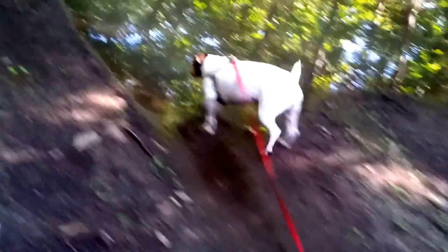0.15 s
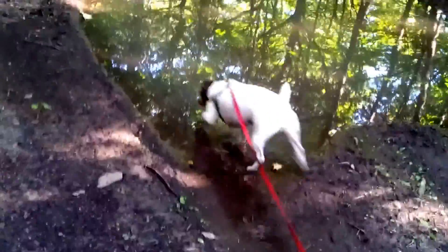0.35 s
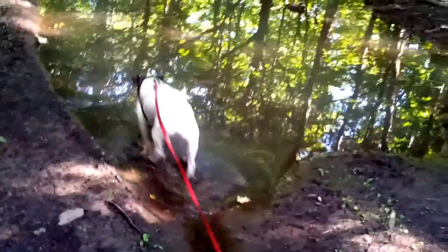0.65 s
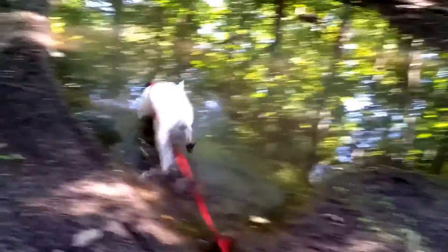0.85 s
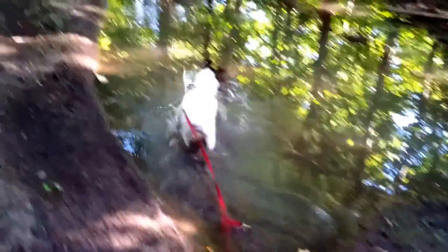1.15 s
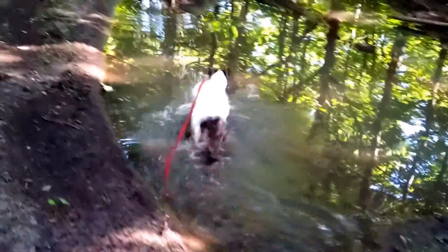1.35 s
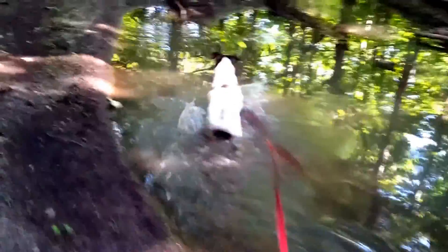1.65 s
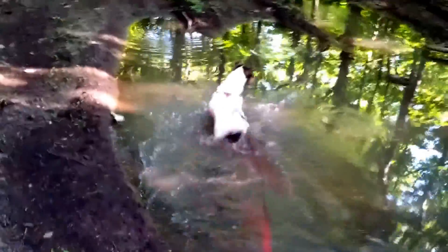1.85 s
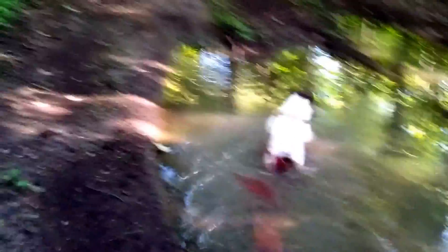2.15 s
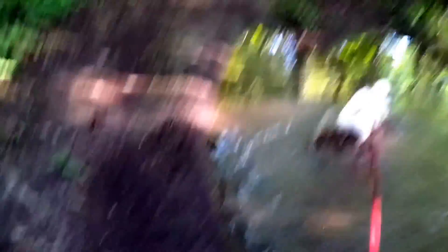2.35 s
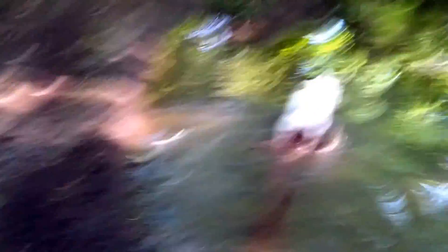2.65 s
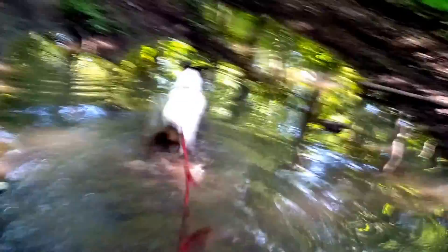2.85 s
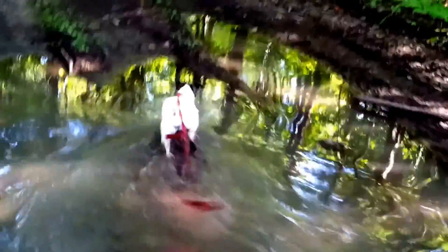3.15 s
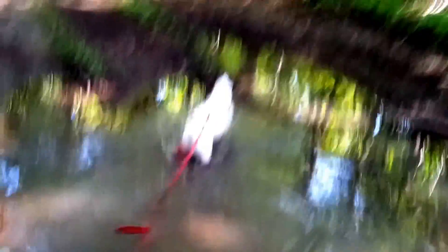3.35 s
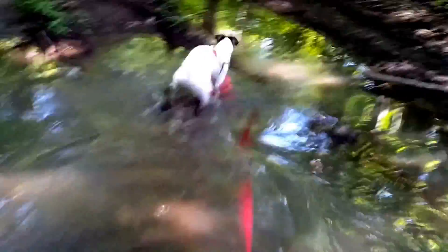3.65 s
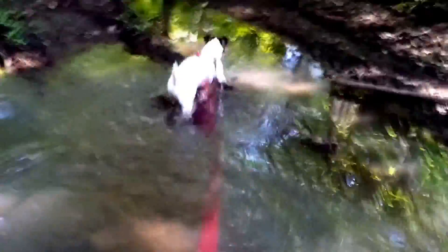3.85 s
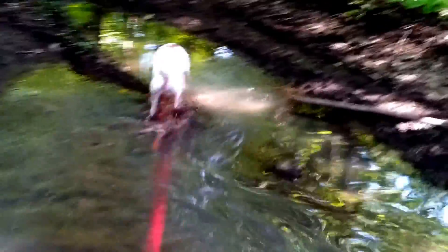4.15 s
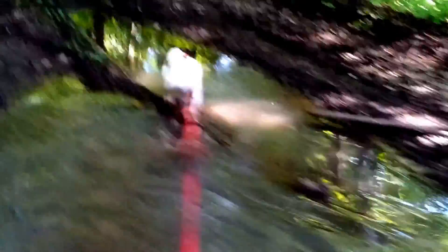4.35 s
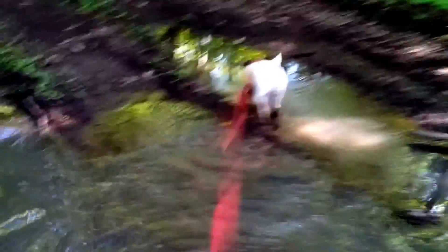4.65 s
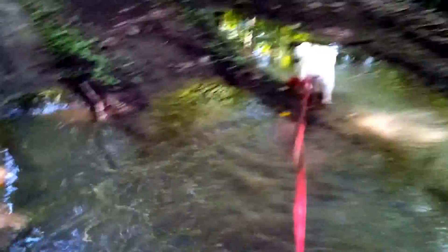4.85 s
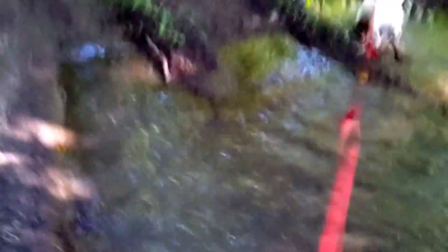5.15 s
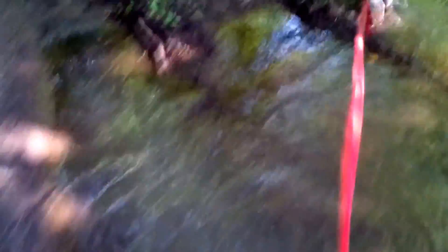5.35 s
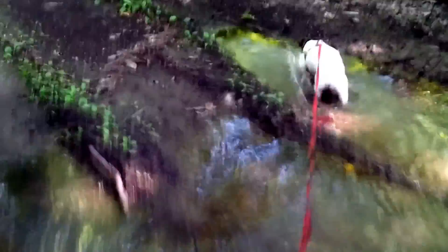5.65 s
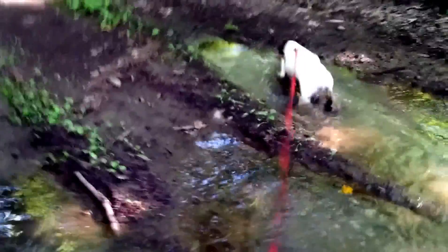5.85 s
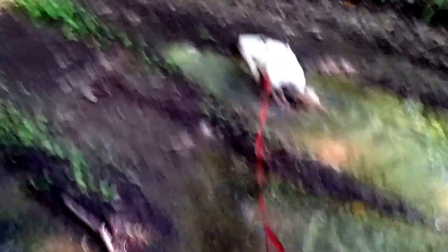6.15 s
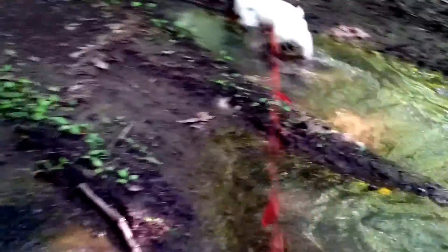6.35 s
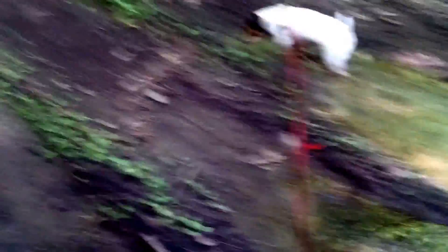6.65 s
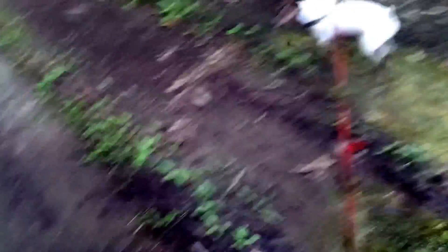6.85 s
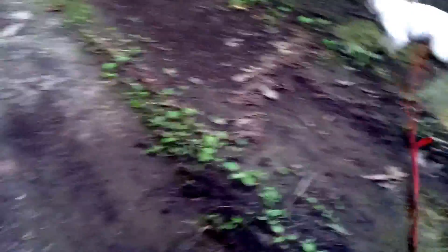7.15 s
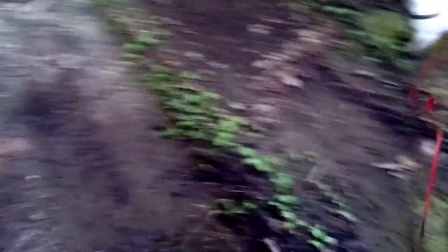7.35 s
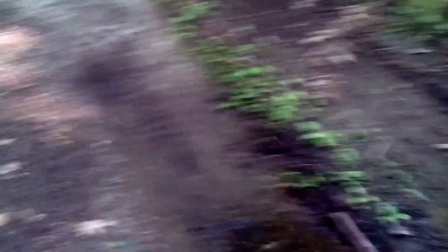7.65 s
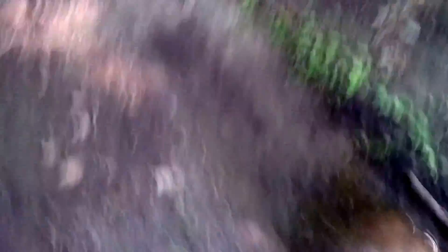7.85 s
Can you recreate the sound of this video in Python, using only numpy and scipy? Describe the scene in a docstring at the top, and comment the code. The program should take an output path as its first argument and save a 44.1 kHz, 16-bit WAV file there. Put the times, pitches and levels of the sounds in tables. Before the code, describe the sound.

A small dog and its walker wade through a shallow woodland stream, heard very close on a hand-held stereo microphone in open, dry air. A faint wash and trickle run throughout. From 0 to 0.6 s there is mostly light, crisp spray and small drop snaps. From about 0.7 s the slosh deepens, with hollow plops and a strong splash near 1.2 s, a sharp slap at 1.5 s, and rapid bubbling strokes through 4 s, including a dull bump at 3.2 s and bright slaps around 3.7 to 3.9 s. From 4.1 to 5.2 s it is thinner, spitting and fizzy. Bumps at 5.5 and 5.7 s accompany fuller sloshing, and a low, heavy plunge lands at 6 s. Splashing lightens around 6.5 to 7.2 s, then plops and gurgles return at 7.3 to 7.7 s. At 7.97 s a hard, short knock hits the casing, mainly left.

```python
"""A small dog and its walker wade through a shallow woodland stream, close to a hand-held camera.
Leg strokes swell a slosh of bubbles and a fizz of spray bursts and pings over rippling churn.
Noise slaps, plopping air pockets, low foot plunges, gurgles and pinging droplets stand out of it.
Shaped noise and faint bubbles make the stream; damped bubble shapes make a few dull bumps.
At the very end a knock rings the camera casing, strongest at the left microphone port."""
import sys
import numpy as np
from scipy import signal
from scipy.fft import rfft, irfft
from scipy.io import wavfile

SR = 44100
rng = np.random.default_rng(int(sys.argv[2]) if len(sys.argv) > 2 else 0)


def inscribe(sig):
    """Save sig as 16-bit PCM at rate SR to the path in sys.argv[1].

    A 1-D sig is mono; a 2-D sig holds one channel per row.
    Samples are clipped to [-1, 1] before scaling.
    """
    pcm = np.round(np.clip(np.atleast_2d(sig).T, -1, 1) * 32767)
    wavfile.write(sys.argv[1], SR, pcm.astype(np.int16))


N = 352359
HZ = np.fft.rfftfreq(N, 1 / SR)
TIME = np.arange(N) / SR

# large air pockets closing behind a leg: t/s, relative level/dB, f/Hz
AIR_POCKETS = [(0.684, -30.5, 1250), (0.925, -20.5, 970), (1.0456, -26.5, 1130), (1.093, -20, 780),
               (1.2021, -17, 1120), (1.2258, -18.5, 670), (1.412, -26.5, 597), (1.5109, -23.5, 1590),
               (1.7675, -25, 620), (2.007, -19, 766), (2.054, -24.5, 1060), (2.5794, -25.5, 710),
               (2.802, -31.5, 980), (2.916, -24, 826), (3.145, -17, 710), (3.2378, -25, 670),
               (3.283, -23, 1510), (3.3154, -18, 1160), (3.512, -24.5, 714), (3.5537, -22.5, 740),
               (3.657, -24, 1280), (3.7317, -14.5, 830), (3.921, -21, 704), (4.9606, -21.5, 1310),
               (5.307, -31, 1160), (5.564, -29, 745), (5.6584, -19.5, 830), (5.9771, -17, 406),
               (5.9878, -15.5, 620), (5.996, -14.5, 840), (6.3474, -23.5, 1340), (6.5098, -24, 1340),
               (6.8594, -26.5, 1430), (6.907, -36, 910), (6.986, -33.5, 760), (7.121, -30, 1450),
               (7.3316, -30, 950), (7.3644, -18, 683), (7.5798, -20.5, 690), (7.594, -23.5, 627),
               (7.7121, -16, 840)]


def gain_of(db):
    """Decibels to amplitude."""
    return 10 ** (np.asarray(db) / 20)


def evened(x):
    """Scales to rms 1."""
    return x / np.sqrt(np.mean(x ** 2) + 1e-20)


def read(points, hz=HZ):
    """Interpolates a table on a log-frequency axis."""
    f, value = np.transpose(points)
    return np.interp(np.log(hz + 1), np.log(f), value)


def add(mix, start_s, sound):
    """Mixes a sound in at start_s."""
    part = mix[..., max(round(start_s * SR), 0):][..., :sound.shape[-1]]
    part += sound[..., :part.shape[-1]]


def colour(x, spectrum):
    """Filters by a spectrum; white noise keeps its level."""
    return irfft(rfft(x) * evened(gain_of(read(spectrum))), N)


def shelf(x, corner_hz, db):
    """Raises what lies below the corner by db, which may change in time."""
    low = irfft(rfft(x) / (1 + (HZ / corner_hz) ** 4), N)
    return x + (gain_of(db) - 1) * low


def ports(pair, direct=0):
    """Mixes a pair into partly alike left and right microphone ports; direct is the least likeness."""
    # likeness of the ports: f/Hz, likeness/(0-1)
    likeness = [(30, 0.25), (120, 0.5), (300, 0.78), (1000, 0.66), (2200, 0.72), (4500, 0.42), (8000, 0.3),
                (13000, 0.52)]
    # left minus right: f/Hz, level/dB
    balance = [(40, 10.3), (130, 4.6), (300, 2.1), (700, 0.45), (2400, 0.46), (4400, 3.4), (8100, 10),
               (13000, 5.5)]
    # phase by which left leads: f/Hz, phase/rad
    lead = [(260, 0.57), (800, 0.29), (3200, 0.81), (4400, 1.6), (7400, -1.6), (8600, -2.3), (11000, -1.5)]
    a, b = rfft(pair)
    same = np.clip(np.maximum(read(likeness), direct), 0, 1)
    right = (same * a + np.sqrt(1 - same ** 2) * b) * np.exp(-1j * read(lead))
    lean = gain_of(read(balance) / 2)
    return irfft(np.array([a * lean, right / lean]), N)


def clicks(per_s, spread_db, limit=4):
    """Sparse random impacts: many small, a few large."""
    strength = np.minimum(rng.exponential(1, N), limit)
    return (rng.random(N) < per_s / SR) * gain_of(spread_db * strength)


def bubble(hz, swell_s, rise, phase=0):
    """A pocket of air swells, rings and decays; a positive rise lifts its pitch as it nears the surface."""
    u = np.arange(int(8 * swell_s * SR) + 2) / (swell_s * SR)
    turns = hz * swell_s * (u - 1 + rise * (u - 1) ** 2 / 2)
    return (u * np.exp(1 - u)) ** 2 * np.cos(2 * np.pi * turns + phase)


def bubbles(low_hz, high_hz, cycles, spread_db, count, size, glide=.05):
    """Bubbles in families of like moment, pitch and strength; each has its own phase at the two ports."""
    family = 4
    shared = rng.random((3, count // family, 1))
    when, pitch, strength = np.repeat(shared, family, axis=1)
    delay, detune, length, drift, left, right = rng.random((6, count, 1))
    when = when + .02 * delay ** 2 * SR / N  # up to 20 ms late
    hz = low_hz * (high_hz / low_hz) ** pitch * 2 ** (.5 * (detune - .5))
    swell_s = cycles * (.5 + length) / hz
    u = np.arange(size) / (swell_s * SR)
    envelope = gain_of(-spread_db * np.log(strength + 0.013)) * (u * np.exp(1 - u)) ** 2
    # most climb in pitch as they rise; some are dragged down
    turns = hz * swell_s * u * (1 + glide * (2 * drift - .7) * u)
    at = ((when * N).astype(int) + np.arange(size)).ravel()
    sides = []
    for phase in (left, right):
        ringing = envelope * np.cos(2 * np.pi * (turns + phase))
        sides.append(np.bincount(at, ringing.ravel(), N)[:N])
    return evened(np.array(sides))


def ripple(low_hz, high_hz):
    """A slow random wobble of rms 1, summed from sines that weaken with frequency."""
    t = np.arange(0, N + 128, 128) / SR
    waves = np.zeros(len(t))
    for hz, turn in zip(np.geomspace(low_hz, high_hz, 24), rng.random(24)):
        waves += np.sin(2 * np.pi * (hz * t + turn)) / np.sqrt(hz)
    return np.interp(TIME, t, evened(waves))


def stream(trickle_db=-59):
    """The even wash of stream and woods is shaped noise; faint bubbles make the trickle."""
    # wash spectrum: f/Hz, relative density/dB
    wash_spectrum = [(20, -6.5), (60, -1), (200, -2.1), (450, -6.5), (800, -8), (1600, -14.5),
                     (3000, -11.5), (6000, -4), (10000, -10.5), (15000, -29)]
    wash_db = -44.5
    wash = gain_of(wash_db) * colour(rng.standard_normal((2, N)), wash_spectrum)
    trickle = bubbles(low_hz=594, high_hz=3280, cycles=4.2, spread_db=0.0, count=600, size=1024)
    return wash + gain_of(trickle_db) * trickle


def bumps(level_db=-1, cycles=0.55, left_db=-3, lag_s=0.00019):
    """Dull bumps near the camera, perhaps the leash handle: damped pulses that reach the left port first."""
    # t/s, relative level/dB, f/Hz
    bump_rows = [(2.213, -28.5, 420), (3.2, -10, 770), (5.196, -21.5, 1000), (5.5332, -9.5, 790),
                 (5.71, -14.5, 790), (7.683, -16, 640)]
    out = np.zeros((2, N))
    for start_s, db, hz in bump_rows:
        bump = gain_of(db + level_db) * bubble(hz, cycles / hz, 0)
        add(out[0], start_s, gain_of(left_db) * bump)
        add(out[1], start_s + lag_s, bump)
    return out


def knock(right_db=-17, click_db=-24, click_s=0.0014, low_hz=145, lag_s=0.00121,
          overload=1.5, sway_db=-26, sway_hz=48, sway_s=0.027):
    """A tap rings the casing's modes, overloads and sways; the right port hears it later and weaker."""
    # the tap: t/s, level before overload/dB
    knock_s, knock_db = (7.9657, 0)
    # casing modes: f/Hz, relative level/dB, decay/s
    casing_modes = [(260, -15, 0.0089), (470, 1.5, 0.0017), (706, 3, 0.0016), (1120, 2, 0.0016),
                    (2130, -20, 0.00092)]
    t = np.arange(SR // 25) / SR
    ring = np.zeros(len(t))
    for hz, db, decay_s in casing_modes:
        ring += gain_of(db) * np.exp(-t / decay_s) * np.sin(2 * np.pi * hz * t)
    tick = gain_of(click_db) * np.exp(-t / click_s) * rng.standard_normal(len(t))
    blow = np.clip(gain_of(knock_db) * (ring + tick), -overload, overload)
    tap = signal.lfilter(*signal.butter(2, low_hz, "high", fs=SR), blow)
    tap = tap - gain_of(sway_db) * np.exp(-t / sway_s) * np.sin(2 * np.pi * sway_hz * t)
    out = np.zeros((2, N))
    add(out[0], knock_s, tap)
    add(out[1], knock_s + lag_s, gain_of(right_db) * tap)
    return out


def drips(level_db=-44, spread_db=7, low_hz=700, high_hz=2100, cycles=3.37, rise=0.038, count=70):
    """Stray drops from legs and leash each leave one small rising bubble; the small ones are fainter."""
    out = np.zeros(N)
    for when, size, strength in rng.random((count, 3)):
        hz = low_hz * (high_hz / low_hz) ** size
        gain = gain_of(level_db - spread_db * strength) * np.sqrt(low_hz / hz)
        add(out, when * N / SR, gain * bubble(hz, cycles / hz, rise))
    return np.array([out, out])


def ticks(level_db=-27, spread_db=9, decay_s=.0004, count=36):
    """Single drops flung near the microphone land with a tiny bright noise tick."""
    t = np.arange(SR // 200) / SR
    out = np.zeros((2, N))
    for when, strength in rng.random((count, 2)):
        burst = np.exp(-t / decay_s) * rng.standard_normal((2, len(t)))
        add(out, when * N / SR, gain_of(level_db - spread_db * strength) * burst)
    return colour(out, [(2500, -25), (6000, 2), (9000, 0), (15000, -10)])


def droplets(level_db=-3, cycles=4, rise=0.018):
    """Each landing droplet traps a tiny bubble that pings briefly."""
    # t/s, relative level/dB, f/Hz
    droplet_rows = [(0.9392, -13, 4610), (1.0066, -15, 4710), (1.0635, -20, 3840), (2.4099, -22, 2900),
                    (2.69, -21, 2840), (2.9348, -17.5, 4650), (3.6508, -11.5, 6740), (4.0243, -22, 2450)]
    out = np.zeros(N)
    for start_s, db, hz in droplet_rows:
        add(out, start_s, gain_of(db + level_db) * bubble(hz, cycles / hz, rise))
    return np.array([out, out])


def gurgles(level_db=-2, cycles=6, follower_db=-7, spacing_s=0.018, detune=0.19):
    """Bubbles in a leg's wake ring and glide, each with a weaker one loosely before and after it."""
    # t at its height/s, relative level/dB, f/Hz, glide/share of f
    gurgle_rows = [(1.01, -33, 738, -0.083), (1.158, -31, 670, -0.086), (1.313, -33, 727, -0.019),
                   (1.492, -28, 750, 0.0043), (1.595, -30, 646, -0.061), (1.68, -33.5, 657, 0.059),
                   (1.749, -36, 670, 0.041), (1.871, -31, 1260, 0.059), (1.892, -35, 800, 0.013),
                   (1.921, -29.5, 632, -0.047), (2.235, -32.5, 1500, 0.028), (2.251, -27.5, 707, 0.022),
                   (2.346, -30.5, 1530, -.05), (2.401, -33, 637, -0.033), (2.597, -31.5, 682, 0.0072),
                   (2.9, -35, 663, -0.018), (3.303, -26.5, 1245, 0.023), (3.382, -32, 805, -0.0006),
                   (3.519, -33, 1330, 0.2), (3.526, -32, 723, -0.0037), (3.642, -30, 1520, 0.12),
                   (4.803, -35.5, 654, 0.0031), (6.424, -31, 1200, -0.011), (7.449, -32.5, 695, 0.06),
                   (7.858, -37, 907, .12)]
    out = np.zeros(N)
    chances = rng.uniform(-0.994, 1, (len(gurgle_rows), 3, 2))
    for (peak_s, db, hz, glide), chance in zip(gurgle_rows, chances):
        for place, (late, off) in zip((-1, 0, 1), chance):
            pitch_hz = hz * (1 + place * (glide + detune * off))
            swell_s = cycles / pitch_hz
            start_s = peak_s + place * spacing_s * (1 + late / 2) - swell_s
            gain = gain_of(db + level_db + abs(place) * follower_db)
            add(out, start_s, gain * bubble(pitch_hz, swell_s, glide))
    return np.array([out, out])


def plunges(level_db=-3, decay_s=0.015, rumble_db=-6):
    """A foot shoves the water down to the bed: a dull damped throb and a short low churn of noise."""
    # t/s, relative level/dB, f/Hz
    plunge_rows = [(0.727, -34.5, 193), (1.204, -27.5, 205), (1.225, -37, 300), (1.413, -35, 343),
                   (1.647, -35, 220), (2.088, -23, 386), (2.61, -36, 282), (3.448, -34.5, 340),
                   (3.731, -27.5, 180), (4.586, -38, 121), (5.53, -30.5, 376), (5.972, -20.5, 390),
                   (5.98, -28, 122), (6.003, -28, 264), (7.582, -33.5, 290)]
    t = np.arange(SR // 8) / SR
    throb, churn = np.zeros((2, 2, N))
    for start_s, db, hz in plunge_rows:
        add(throb, start_s, gain_of(db) * bubble(hz, 0.68 / hz, 0.017))
        burst = np.exp(-t / decay_s) * rng.standard_normal((2, len(t)))
        add(churn, start_s, gain_of(db + rumble_db) * burst)
    churn = colour(churn, [(50, -27), (130, 7.5), (260, 5.0), (500, 3.0), (1200, -13), (4000, -60)])
    return ports(gain_of(level_db) * throb, direct=0.82) + ports(churn)


def splatter(level_db=-13, decay_s=0.0057):
    """The water closing over each air pocket splatters: a short noise burst."""
    t = np.arange(SR // 20) / SR
    out = np.zeros((2, N))
    for start_s, db, _ in AIR_POCKETS:
        burst = np.exp(-t / decay_s) * rng.standard_normal((2, len(t)))
        add(out, start_s, gain_of(db + level_db) * burst)
    return colour(out, [(200, -18.0), (700, 6.5), (1700, 0.5), (4000, -8), (9000, -37)])


def plops(level_db=0.5, rise=0.008, after_db=-15, after_s=0.00513):
    """Each large air pocket rings, violent ones more briefly, and sheds a weaker bubble as it closes."""
    swell_cycles = 1.29  # at reference_db
    reference_db = -22
    halving_db = 20  # this much louder halves the swell
    out = np.zeros(N)
    chances = rng.random((len(AIR_POCKETS), 3))
    for (start_s, db, hz), (turn, size, wait) in zip(AIR_POCKETS, chances):
        swell_s = swell_cycles * 2 ** ((reference_db - db) / halving_db) / hz
        pocket = bubble(hz, swell_s, rise, 2 * np.pi * turn)
        follower = bubble(hz * (0.846 + 0.57 * size), 2 * swell_s, rise)
        add(out, start_s, gain_of(db + level_db) * pocket)
        add(out, start_s + after_s * (.5 + wait), gain_of(db + after_db) * follower)
    return np.array([out, out])


def slaps(level_db=-4.0, tail_db=-14, body_db=1, lead_db=-10):
    """Leading drops, a sharp snap of water on water, a short tail of spray; thick slabs smack lower."""
    # t/s, relative level/dB, body/dB (low for a drop, high for a slab of water)
    slap_rows = [(0.235, -17, -16), (0.3796, -14.5, -28), (0.517, -17.5, -11.5), (0.5864, -18.5, -11.5),
                 (0.9263, -12, -21), (1.2027, -15, -3), (1.401, -15.5, -18), (1.5122, -6.5, -11),
                 (1.539, -15, -29), (1.645, -22.5, -1.5), (1.6717, -16.5, -33), (2.0922, -27.5, -3),
                 (2.397, -25, -8), (2.92, -18, -24), (2.936, -25, -20), (3.3183, -20.5, -3),
                 (3.412, -12.5, -36), (3.4637, -15, -36), (3.499, -18.5, -34), (3.554, -14.5, -17),
                 (3.697, -15.5, -10), (3.7334, -9.5, -40), (3.8602, -13.5, -35), (3.9407, -7, -11),
                 (4.287, -16.5, -34), (4.42, -17.5, -15), (4.5505, -12.5, -40), (5.308, -33, -2),
                 (5.6595, -34, 2), (5.8132, -19, -19), (5.936, -25.5, -3), (5.9957, -14.5, -30),
                 (6.354, -15, -23), (6.381, -12, -33), (6.4552, -18, -23), (6.681, -16, -37),
                 (6.812, -13, -40), (7.213, -18.5, -12), (7.2386, -16.5, -34), (7.365, -11.5, -36),
                 (7.387, -14.5, -31), (7.525, -15.5, -39), (7.64, -25, -2.5), (7.7167, -10, -20)]
    # crack spectrum: f/Hz, relative density/dB
    crack_spectrum = [(200, -11), (700, -33), (2600, -36), (4200, -2), (6300, 6.5), (8500, 2),
                      (11000, -7.5), (15500, -27)]
    # drop, then slab: body/dB, decay/s
    (_, drop_decay_s), (slab_above_db, slab_decay_s) = [(-10, 0.00059), (-10.5, 0.0081)]
    lead_s, tail_s, brief_s = .002, .009, .0008
    snap_db, stray_db, scatter_s = -5, -5, .003
    t = np.arange(-(SR // 100), SR // 12) / SR
    after = np.maximum(t, 0)
    crack, smack, snap = np.zeros((3, 2, N))
    for (hit_s, db, body), turns in zip(slap_rows, rng.random((len(slap_rows), 2))):
        decay_s = slab_decay_s if body > slab_above_db else drop_decay_s
        fall = np.exp(-after / decay_s) + gain_of(tail_db) * np.exp(-after / tail_s)
        shape = np.where(t < 0, gain_of(lead_db) * np.exp(-abs(t) / lead_s), fall)
        burst = gain_of(db) * shape * rng.standard_normal((2, len(t)))
        add(crack, hit_s + t[0], burst)
        add(smack, hit_s + t[0], burst * gain_of(body + body_db))
        snap_hz = np.interp(body, [-30, 0], [9000, 4000])  # smaller drops snap higher
        ring = [bubble(snap_hz, 0.000099, 0, 2 * np.pi * turn) for turn in turns]
        sharpness = min((brief_s / decay_s) ** 2, 1.6)  # brief slaps snap harder
        drop = gain_of(db + snap_db) * sharpness * np.array(ring)
        add(snap, hit_s, drop)
        for offset_s in scatter_s * (.5 + turns) * [-1, 1]:  # stray drops just before and after
            add(snap, hit_s + offset_s, gain_of(stray_db) * drop)
    smack = colour(smack, [(300, -25), (900, -3.0), (1900, -1.0), (3600, -3.5), (6000, -25)])
    return gain_of(level_db) * (colour(crack, crack_spectrum) + smack) + snap


def depth(column):
    """The tone of the water along the way, in dB at every sample."""
    # t/s, bass of the gurgling/dB, fullness of the drops/dB
    tone_rows = np.array([(0.45, -28, -8), (1.1, 5, -1), (2.0, -0.5, 0), (2.8, -1.5, 0.5), (3.9, 2.5, 0.5),
                          (4.5, -5, -5), (4.8, 4, 3), (5.25, -3, -3), (5.65, -3, -1.5), (6.4, -8, -4.5),
                          (7.0, -10.5, -5), (7.5, -2, -24)])
    return np.interp(TIME, tone_rows[:, 0], tone_rows[:, column])


def surge():
    """A foot breaking the surface sets off a wash: a gain that starts at once and settles."""
    # t/s, relative sloshing level/dB, settling time/s
    surge_rows = [(1.204, -31, 0.05), (2.09, -35.5, 0.05), (4.985, -40.5, 0.13), (5.306, -36, 0.12),
                  (5.988, -41, 0.019)]
    t = np.arange(SR // 2) / SR
    power = np.zeros(N)
    for start_s, db, settle_s in surge_rows:
        add(power, start_s, (gain_of(db) * np.exp(-t / settle_s)) ** 2)
    return np.sqrt(power)


def effort(column, churn_db, stroke_db, ripple_db, linger):
    """Spray (column 1) or slosh (2) gain: each leg stroke builds up and settles over the rippling churn."""
    # water churning between strokes: t/s, relative spray level/dB, relative sloshing level/dB
    churn_rows = np.array([(0.0, -41.5, -58.5), (0.33, -49, -65.5), (0.63, -39, -62), (0.8, -43, -49.5),
                           (1.0, -40, -41.5), (1.55, -35, -44.5), (1.9, -40.5, -46), (2.5, -39, -45.5),
                           (3.12, -40, -46.5), (3.5, -40, -47.5), (4.15, -37, -49.5), (4.55, -43, -59),
                           (5.28, -47, -59), (5.48, -41, -48), (5.57, -36.5, -43), (6.3, -39, -47),
                           (6.75, -45.5, -54), (7.2, -40.5, -49.5), (7.45, -41, -44), (7.6, -36.5, -43),
                           (7.99, -47.5, -49)])
    # leg strokes: t at height/s, relative spray level/dB, relative sloshing level/dB, settling time/s
    stroke_rows = [(0.05, -37, -74, 0.26), (0.215, -33.5, -49, 0.058), (0.483, -33, -48, 0.029),
                   (0.699, -39.5, -44.5, 0.045), (0.932, -30, -42, 0.083), (1.062, -35.5, -58, 0.16),
                   (1.098, -30.5, -41, 0.017), (1.213, -26, -46, 0.027), (1.391, -33.5, -44, 0.12),
                   (1.485, -35.5, -34.5, 0.058), (1.62, -35, -38.5, 0.066), (1.765, -37, -42, 0.072),
                   (2.005, -29.5, -53, 0.013), (2.406, -31.5, -34, 0.03), (2.588, -38.5, -44, 0.074),
                   (2.693, -35, -38.5, 0.09), (2.941, -36, -38.5, 0.054), (3.18, -33.5, -36.5, 0.052),
                   (3.285, -32.5, -37, 0.12), (3.419, -41, -36, 0.022), (3.6, -34, -61, 0.14),
                   (3.762, -35, -39.5, 0.081), (3.929, -32.5, -39.5, 0.041), (4.03, -33.5, -44.5, 0.045),
                   (4.29, -37, -55, 0.029), (4.675, -37.5, -59, 0.091), (4.924, -38.5, -51, 0.042),
                   (5.2, -36, -51, 0.046), (5.657, -35.5, -30.5, 0.033), (5.845, -36.5, -44, 0.077),
                   (5.977, -36, -33, 0.033), (6.179, -38.5, -38.5, 0.034), (6.362, -30, -45, 0.05),
                   (6.89, -46, -46.5, 0.13), (7.077, -39, -44, 0.024), (7.305, -35.5, -42, 0.029),
                   (7.724, -34, -37, 0.039)]
    push_share = 0.67  # build-up time as a share of the settling time
    base_db = np.interp(TIME, churn_rows[:, 0], churn_rows[:, column]) + churn_db
    power = gain_of(base_db + ripple_db * ripple(low_hz=13, high_hz=54.8)) ** 2
    for row in stroke_rows:
        peak_s, settle_s = row[0], row[-1]
        t = np.arange(-min(peak_s, 3 * settle_s), 5 * settle_s, 1 / SR)
        build_up = (t / (push_share * settle_s)) ** 2
        shape = np.exp(-np.where(t < 0, build_up, t / (linger * settle_s)))
        add(power, peak_s + t[0], (gain_of(row[column] + stroke_db) * shape) ** 2)
    return np.sqrt(power)


def spray(level_db=0, mist_db=-7.5, ping_db=-1):
    """Droplets land as tiny noise bursts and high pings over a mist of finer ones."""
    # f/Hz, relative density/dB
    spray_spectrum = [(900, -16.5), (1700, -14.5), (2700, -12.5), (3600, -6.5), (4800, -3), (6200, 1),
                      (8200, -1.5), (10500, -8.5), (13000, -10.5), (15500, -39)]
    burst_s = .0004  # decay of the burst power
    impacts = clicks(per_s=1900, spread_db=1.8) ** 2
    power = signal.lfilter([1], [1, -np.exp(-1 / (burst_s * SR))], impacts)
    patter = evened(np.sqrt(power) * rng.standard_normal((2, N)))
    pings = bubbles(low_hz=1800, high_hz=13000, cycles=3, spread_db=2.1, count=14000, size=340)
    mist = gain_of(mist_db) * rng.standard_normal((2, N))
    fizz = colour(evened(patter + gain_of(ping_db) * pings + mist), spray_spectrum)
    fat_db = depth(2)  # fat drops are fuller below and duller on top
    fizz = shelf(shelf(fizz, 3960, fat_db), 32000, fat_db)
    push = effort(1, churn_db=0.2, stroke_db=1.06, ripple_db=1.86, linger=1.0)
    return gain_of(level_db - 1.13 * fat_db) * push * fizz


def slosh(level_db=0.0, froth_db=-5.0, glug_db=-10):
    """Legs push water aside and fold air under: many brief bubbles, a few large longer ones, and froth."""
    # f/Hz, relative density/dB
    slosh_spectrum = [(200, -2), (430, -17.5), (600, -5), (750, -3), (1100, -0.5), (1600, 2), (2600, -1),
                      (4000, 2), (8000, -39)]
    gurgle = bubbles(low_hz=320, high_hz=3600, cycles=3.2, spread_db=2.4, count=8000, size=1200)
    glug = bubbles(low_hz=600, high_hz=780, cycles=5, spread_db=1.7, count=600, size=2600, glide=.1)
    froth = colour(gain_of(froth_db) * rng.standard_normal((2, N)), slosh_spectrum)
    gurgle = evened(colour(gurgle, slosh_spectrum))
    deep_db = depth(1)
    water = shelf(evened(gurgle + gain_of(glug_db) * glug + froth), 1450, deep_db)
    strokes = effort(2, churn_db=1.0, stroke_db=0.5, ripple_db=2.0, linger=0.92)
    push = np.hypot(strokes, surge())
    return gain_of(level_db - deep_db / 2) * push * water


def scene():
    """The water in the open air, and the bumps and the knock at the camera."""
    scattered = spray() + slosh() + slaps() + splatter() + ticks() + stream()
    ringing = plops() + gurgles() + droplets() + drips()
    return ports(scattered) + ports(ringing, direct=1) + plunges() + bumps() + knock()


def record(dry):
    """The recorder clips near full scale and limits the band."""
    ceiling = .92
    edge_hz = 15500
    lowpass = signal.firwin(511, edge_hz, window=("kaiser", 9), fs=SR)
    return signal.oaconvolve(np.clip(dry, -ceiling, ceiling), lowpass[None], "same")


dry = scene()
out = record(dry)
inscribe(out)
```